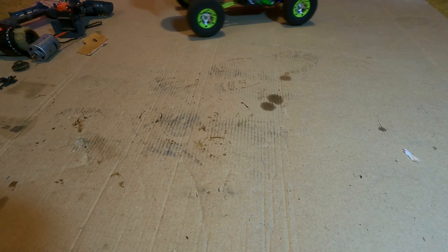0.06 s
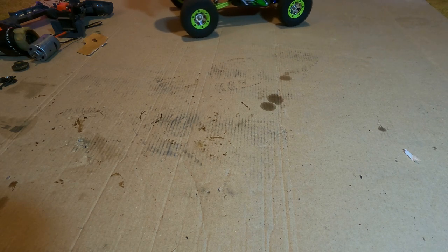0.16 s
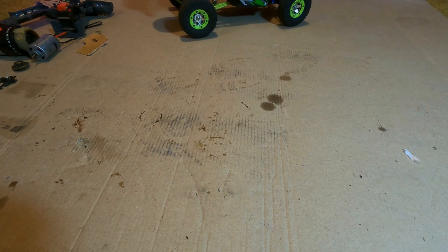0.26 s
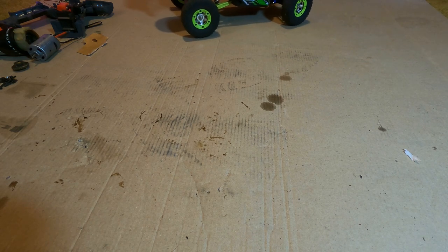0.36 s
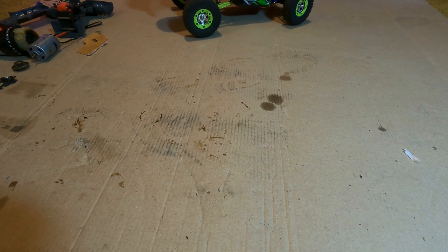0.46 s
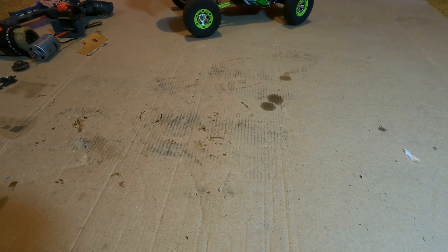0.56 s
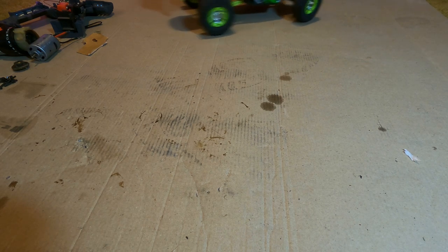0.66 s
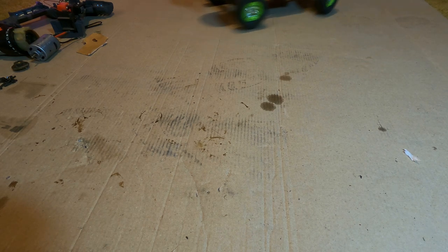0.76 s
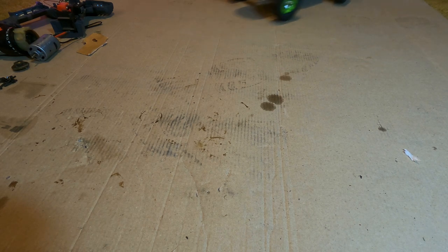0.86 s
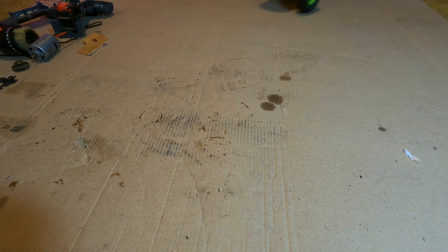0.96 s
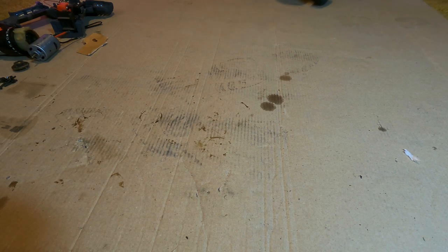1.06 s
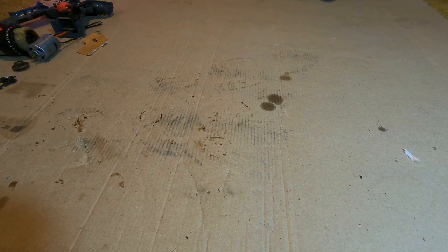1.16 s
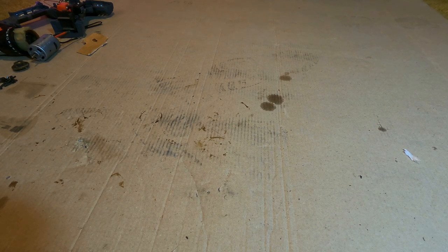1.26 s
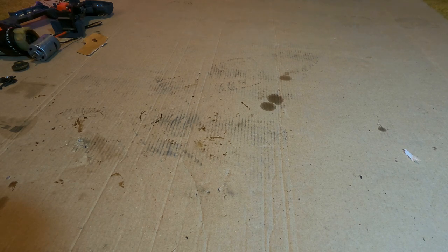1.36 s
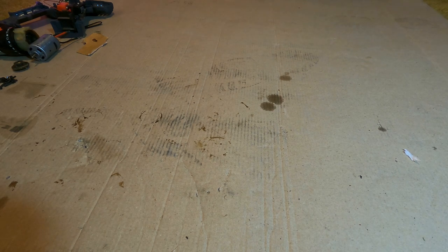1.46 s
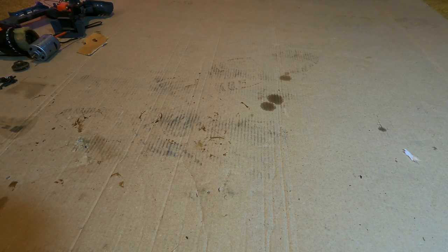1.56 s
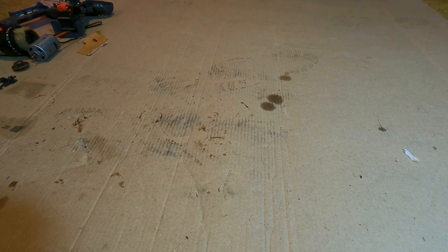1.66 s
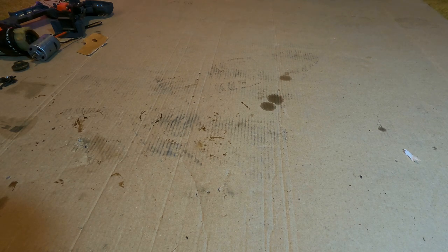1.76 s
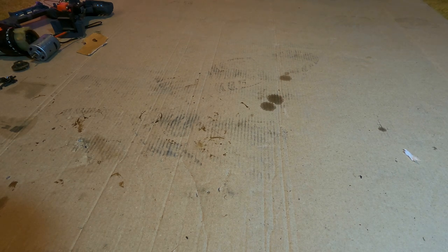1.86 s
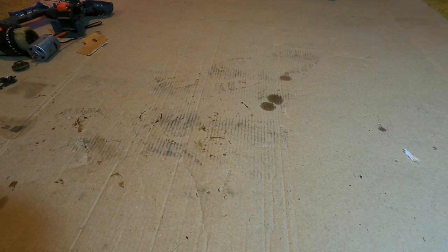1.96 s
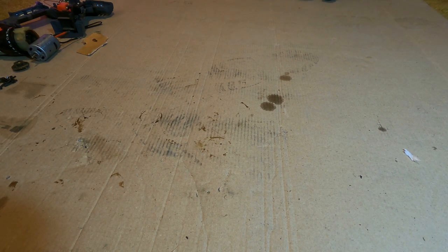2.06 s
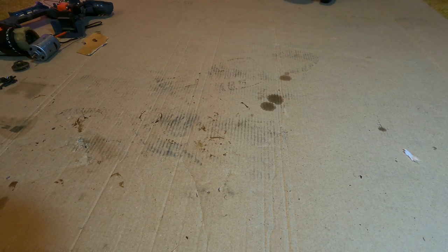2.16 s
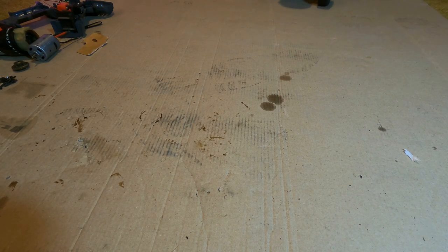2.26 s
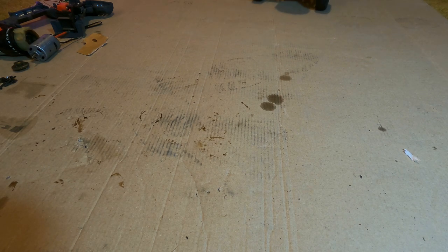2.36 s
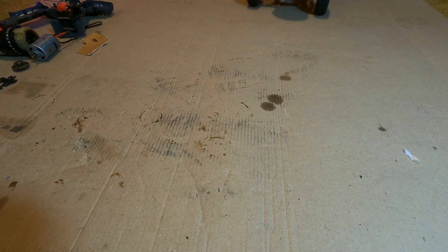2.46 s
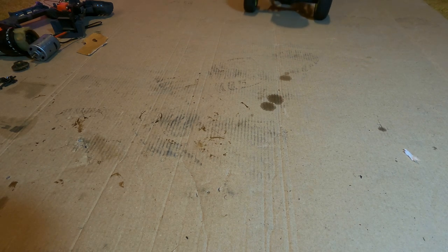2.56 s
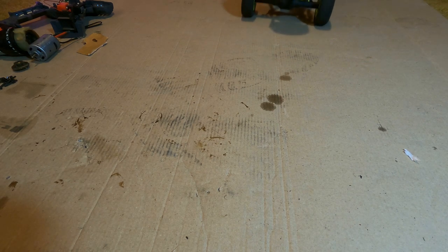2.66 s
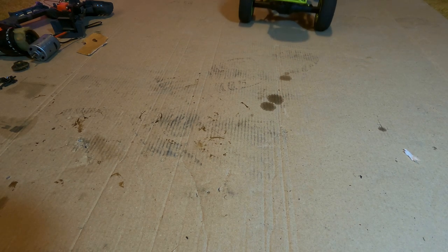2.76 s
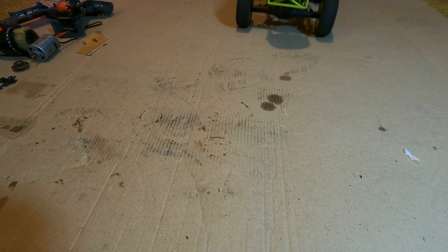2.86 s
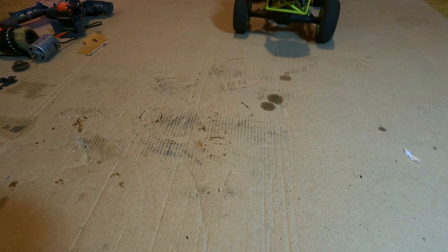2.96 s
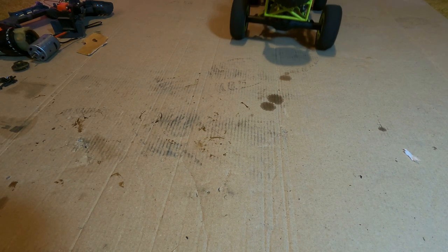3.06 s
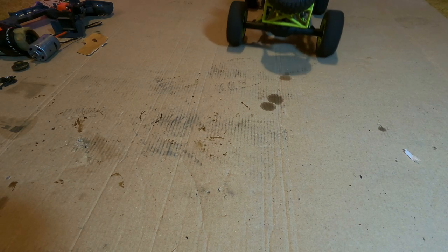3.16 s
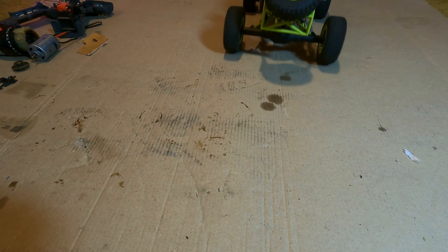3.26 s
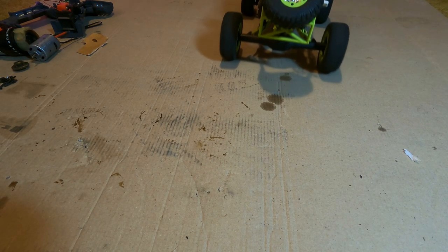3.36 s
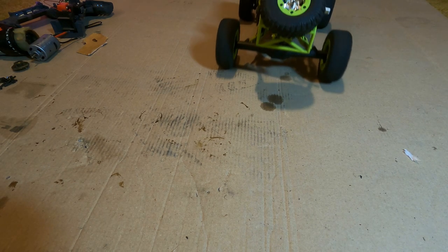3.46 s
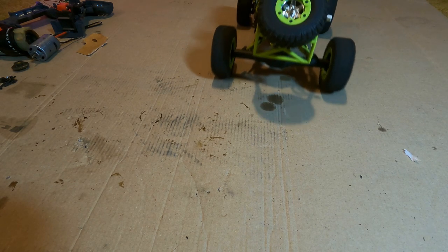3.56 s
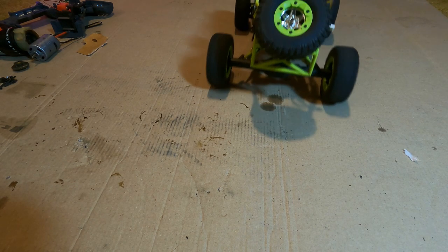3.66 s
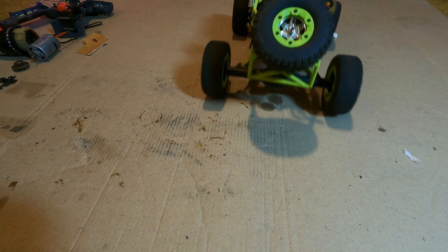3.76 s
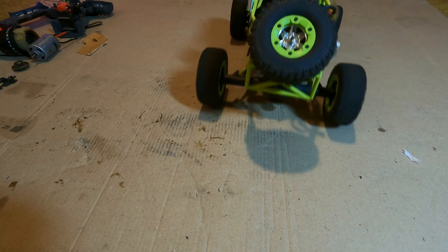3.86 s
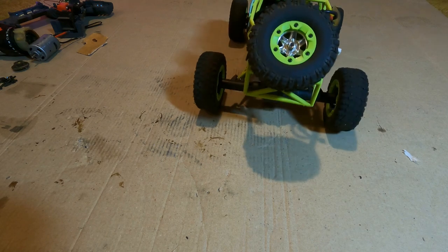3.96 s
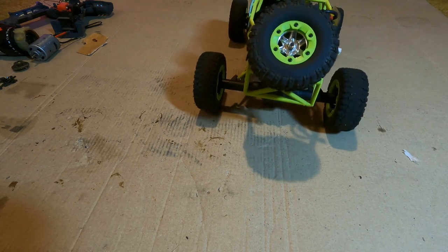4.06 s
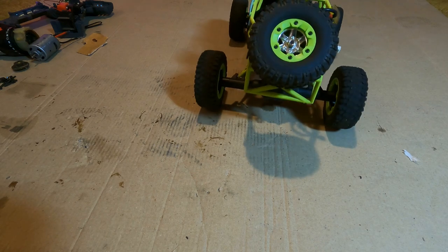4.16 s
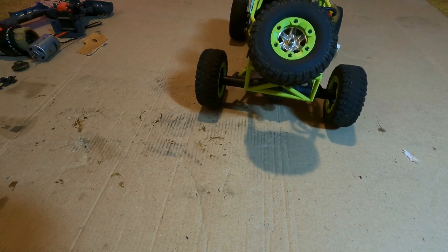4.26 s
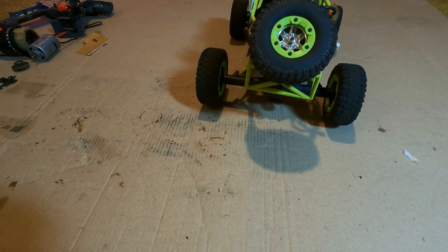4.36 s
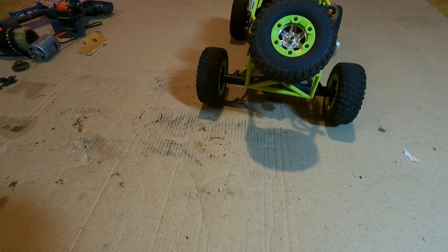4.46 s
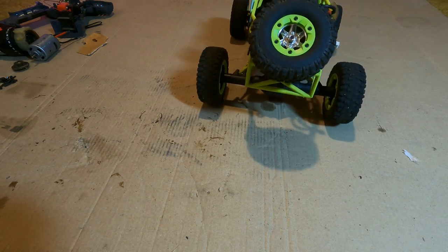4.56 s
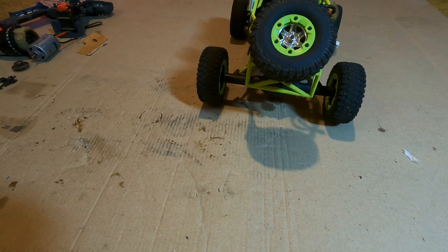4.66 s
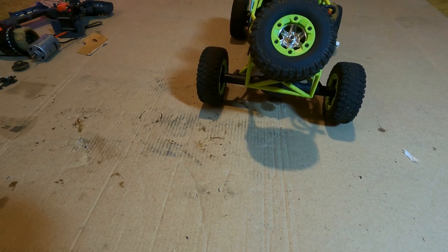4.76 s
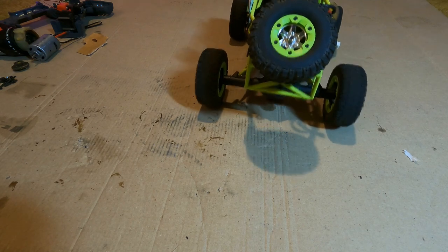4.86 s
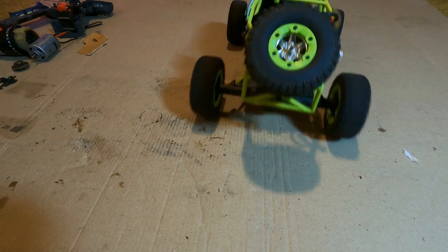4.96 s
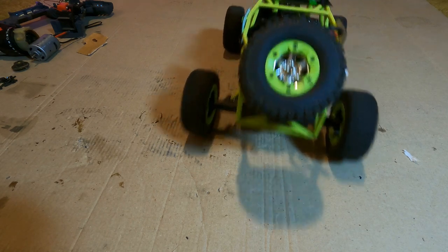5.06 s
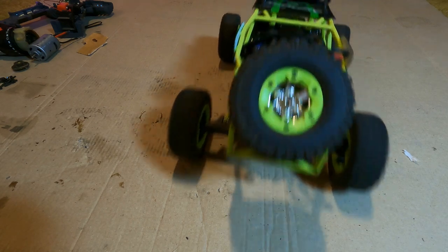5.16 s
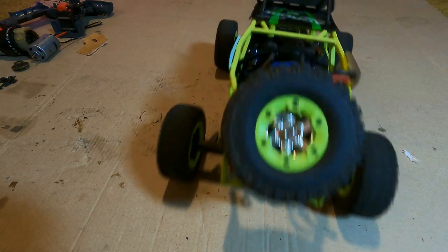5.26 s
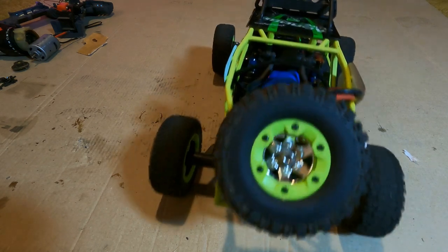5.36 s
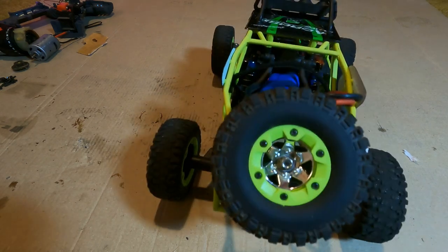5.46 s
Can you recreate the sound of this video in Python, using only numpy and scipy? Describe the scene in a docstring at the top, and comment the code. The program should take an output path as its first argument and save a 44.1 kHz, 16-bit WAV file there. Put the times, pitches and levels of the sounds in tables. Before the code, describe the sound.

A toy off-road car's steering servo whirrs, then it rattles away, creeps back with a thin electric whine, stops, and lurches closer with plastic knocks.

```python
"""First a steering servo whirrs over the room's hum, then a toy off-road car on a workshop floor drives off,
creeps back towards the microphone, stops and lurches on. Switching current sings in the motor, with rotor
side tones and a Doppler shift. Contact noise from gears and treads excites the chassis resonances,
slack parts knock as struck resonators, and a lagged noise band rumbles in the floor."""
import sys
import numpy as np
from scipy import signal
from scipy.fft import rfft, irfft
from scipy.io import wavfile

SR = 44100
rng = np.random.default_rng(int(sys.argv[2]) if len(sys.argv) > 2 else 0)


def file_out(sig):
    """Save sig as 16-bit WAV at sys.argv[1]."""
    # one column per channel
    cols = np.atleast_2d(sig).T
    # limit, then scale
    lim = np.clip(cols, -1, 1)
    pcm = np.round(lim * 32767).astype(np.int16)
    wavfile.write(sys.argv[1], SR, pcm)


N = 242991


def amp(db):
    """Logarithmic level: decibels to amplitude gain."""
    return 10 ** (np.asarray(db) / 20)


def rms_one(x):
    """Energy normalisation: scale to unit rms."""
    return x / np.sqrt(np.mean(x ** 2) + 1e-20)


def in_time(rows):
    """Linear interpolation: table columns become curves with one value a sample."""
    s, *columns = np.transpose(rows)
    return [np.interp(np.arange(N) / SR, s, column) for column in columns]


def gate(on_s, off_s, fade_s):
    """Squared-ramp envelope: fades in from on_s and is out by off_s."""
    t = np.arange(N) / SR
    return np.clip(np.minimum(t - on_s, off_s - t) / fade_s, 0, 1) ** 2


def drift(rate):
    """Low-passed noise: slow random wander with unit rms."""
    r = np.exp(-2 * np.pi * rate / SR)
    wander = signal.lfilter([1], [1, -2 * r, r * r], rng.standard_normal(N + SR))
    return rms_one(wander[SR:])


def butter_filter(x, order, edges_hz, kind):
    """Butterworth filtering: a maximally flat passband."""
    return signal.sosfilt(signal.butter(order, edges_hz, kind, fs=SR, output="sos"), x)


def band(x, edges_hz, kind):
    """Band limiting: a steep filter, then unit rms."""
    return rms_one(butter_filter(x, 4, edges_hz, kind))


def colour(x, points):
    """Minimum-phase filtering: a causal response with the given spectrum; unit rms."""
    hz, db = np.transpose(points)
    size = 8192
    bins_hz = np.arange(size // 2 + 1) * SR / size
    log_gain = np.log(amp(np.interp(np.log(bins_hz + 1), np.log(hz), db)))
    # folding the cepstrum onto positive times makes the filter causal
    cepstrum = irfft(log_gain)
    cepstrum[1:size // 2] *= 2
    cepstrum[size // 2 + 1:] = 0
    return rms_one(signal.fftconvolve(x, irfft(np.exp(rfft(cepstrum))))[:N])


def ring(clicks, hz, t60):
    """Damped resonance: a unit click starts a decaying sine of initial height 1."""
    r, w = amp(-60 / (t60 * SR)), 2 * np.pi * hz / SR
    return signal.lfilter([0, np.sin(w)], [1, -2 * r * np.cos(w), r * r], clicks + 1e-18)


def decaying(impulses, length_s):
    """Exponential relaxation: each impulse leaves an envelope that falls to 1/e in length_s."""
    return signal.lfilter([1], [1, -np.exp(-1 / (length_s * SR))], impulses)


def scratches(per_s, length_s):
    """Poisson contact process: envelope of brief random contacts; unit rms."""
    sizes = amp(3.0 * np.minimum(rng.exponential(1, N), 3)) * (rng.random(N) < per_s / SR)
    return rms_one(decaying(sizes, length_s))


def pair(spectrum, side_db, wide_db, wide_above_hz):
    """Partial coherence: coloured noise nearly alike left and right in the bass, wider above."""
    mid = colour(rng.standard_normal(N), spectrum)
    side = colour(rng.standard_normal(N), spectrum)
    side = amp(side_db) * side + amp(wide_db) * butter_filter(side, 2, wide_above_hz, "high")
    return mid + side * [[1], [-1]]


# spectrum of the room's hum: (frequency [Hz], level [dB per Hz])
HUM_SPECTRUM = [(12, -35), (20, -18), (69, -35), (101, -8.5), (123, -16.5), (150, -6), (187, -3),
                (293, -13), (349, -21.5), (405, -21.5), (532, -29), (812, -25), (1470, -27), (3790, -46),
                (7600, -43.5), (9880, -59.5), (13000, -61), (16700, -100)]
HUM_DB = -58


def hum():
    """Stationary broadband noise: the room's steady, mostly low hum."""
    return amp(HUM_DB) * pair(HUM_SPECTRUM, side_db=-10, wide_db=-7, wide_above_hz=275)


ROOM_T60_S, ROOM_DB = 0.25, -11


def room(x):
    """Diffuse reverberation: an exponentially decaying noise tail, different on each side."""
    t = np.arange(SR // 2) / SR
    tails = rng.standard_normal((2, len(t))) * amp(-60 * t / ROOM_T60_S) * (t > .003)
    tails = signal.lfilter([1], [1, -.6], tails)   # duller tail
    wet = [signal.fftconvolve(x, tail / np.sqrt(np.sum(tail ** 2)))[:N] for tail in tails]
    return amp(ROOM_DB) * np.array(wet)


# spectrum of the shaken floor: (frequency [Hz], level [dB per Hz])
FLOOR_SPECTRUM = [(11, -54), (18, -7), (51, 3.5), (98, -5.5), (130, -15), (174, -12.5), (283, -25.5),
                  (400, -25), (500, -38.5), (650, -49.5), (1100, -120)]
# wheels jolt the floor: (time [s], level [dB])
FLOOR_JOLTS = [(.22, -52.5), (.73, -47), (1.11, -51), (2.09, -49), (2.411, -43), (2.68, -56), (3.62, -46),
               (5.22, -49.5)]
JOLT_S, RUMBLE_LAG_S = 0.031, 0.014
STILL_FLOOR_DB, STEERING_SHAKE_DB = -76, -10   # floor at rest; rumble re the steering whirr


def floor_rumble(rolling_db, whirr_gain):
    """Structure-borne sound: the floor follows wheels and steering with a lag and booms at each jolt."""
    t, keep = np.arange(N) / SR, np.exp(-1 / (RUMBLE_LAG_S * SR))
    drive = amp(rolling_db) + amp(STEERING_SHAKE_DB) * whirr_gain
    shake = signal.lfilter([1 - keep], [1, -keep], drive)
    jolts = sum(amp(db) * np.exp(-((t - s) / JOLT_S) ** 2) for s, db in FLOOR_JOLTS)
    noise = pair(FLOOR_SPECTRUM, side_db=-16.0, wide_db=-16, wide_above_hz=230)
    return (shake + jolts + amp(STILL_FLOOR_DB)) * noise


# knocks: (time [s], peak of the middle band [dB], ring [Hz], low body [dB re that peak]); most are slack parts,
# but the rows from 5.02 s to 5.39 s are the pinion clacking once a turn as the car lurches on
KNOCK_ROWS = [(.2663, -33, 3340, -1), (.4415, -54, 2850, 1), (.529, -60, 4000, -10),
              (0.586, -56, 4000, -10), (.653, -30, 4330, -3), (.7415, -45, 4040, 5),
              (.9001, -24.5, 4360, -18), (.9492, -30, 5100, -24), (.9614, -25, 5730, -8),
              (1.1542, -38, 6000, -8), (1.2494, -37, 6160, -12), (1.3229, -40, 2740, 1),
              (1.451, -41, 2926, -26), (1.9025, -45, 2720, 2), (2.51, -34, 2820, -3.5),
              (3.4945, -41, 2720, -5), (3.834, -36.5, 3520, -15.5), (3.8711, -28, 4170, -9),
              (3.8877, -30, 4220, -4.5), (3.899, -24, 4570, -7), (3.9244, -36, 2670, -15),
              (3.9336, -28, 3460, -7.5), (4.278, -56, 3000, -10), (4.4283, -39, 3320, 0.5),
              (4.8181, -45.5, 3060, -4), (4.8985, -27, 3284, -6), (4.9189, -36, 3164, 4.5),
              (4.944, -39, 3360, 6), (5.0244, -39.5, 2380, 5), (5.0574, -34, 2975, -2),
              (5.0865, -38, 2700, -13), (5.1083, -39.5, 2580, 0), (5.1338, -31, 2670, 0.5),
              (5.1774, -31, 4600, -14), (5.2057, -25.5, 4229, -6), (5.2355, -28.5, 2731, -19),
              (5.2704, -30.5, 2640, -22), (5.2775, -21.5, 3800, -11), (5.2824, -23.5, 2800, -7.5),
              (5.31, -26.5, 3740, -11), (5.3457, -28, 3070, -1), (5.3842, -42, 2342, 6),
              (5.4103, -38, 2380, -13), (5.4306, -43, 2300, -12), (5.4742, -19.5, 3000, -38),
              (5.4897, -46, 2980, -8), (5.4998, -17, 5500, -5)]
# modes of the plastic body: (frequency [Hz], level [dB], decay by 60 dB [s])
BODY_MODES = [(1000, 1.5, 0.026), (1290, 12.5, 0.012), (1730, 12, 0.0083)]
CRACK_S, KNOCK_RING_S = .0014, .007   # fall to 1/e; fall by 60 dB
SNAP_DB = -31.5   # treble snap re the middle band's peak


def knocks():
    """Impact excitation: a noise crack rings near its own pitch, snaps in the treble and thumps the body."""
    size = 4096
    out, t = np.zeros(N + size), np.arange(size) / SR
    for s, db, hz, body_db in KNOCK_ROWS:
        crack = rng.standard_normal(size) * np.exp(-t / CRACK_S)
        middle = butter_filter(crack, 2, [0.7 * hz, 1.32 * hz], "band")
        middle = middle / np.abs(middle).max() + 0.064 * ring(crack, hz, KNOCK_RING_S)
        snap = butter_filter(crack, 3, [4800, 8500], "band")
        low = sum(amp(mode_db) * ring(crack, mode_hz, t60) for mode_hz, mode_db, t60 in BODY_MODES)
        at = round(s * SR)
        for part, part_db in ((middle, 0), (low, body_db), (snap, SNAP_DB)):
            out[at:at + size] += amp(db + part_db) * part / np.abs(part).max()
    return butter_filter(out[:N], 2, [700, 9000], "band")


# steering sweeps: (start [s], fastest [s], end [s], speed-up [s], slow-down [s],
# then at full speed: gear mesh [Hz], mesh tone [dB], whirr [dB])
STEERING_SWEEPS = [(-.03, .084, .22, .026, .023, 4150, -43, -43), (.2, .354, .49, .1, .057, 3170, -53, -51),
                   (1.425, 1.478, 1.65, .09, .042, 3080, -50, -52),
                   (2.54, 2.579, 2.71, .015, .04, 4000, -47, -48)]
PEAK_SHARPNESS = 1.5   # 1 a pointed top, 2 a round one
SWEEP_FADE_S = 0.032
TONE_DB_PER_OCTAVE, WHIRR_DB_PER_OCTAVE = 15, 8.5   # as the servo slows, the tone sinks faster


def sweeps():
    """Speed-dependent radiation: the servo spins up and runs down, steering mesh pitch, tone and whirr gain."""
    t, mesh_hz, tone, whirr = np.arange(N) / SR, np.zeros(N), np.zeros(N), np.zeros(N)
    for start, top, end, up, down, hz, tone_db, whirr_db in STEERING_SWEEPS:
        from_top = np.abs(t - top) / np.where(t < top, up, down)
        speed = (1 + from_top ** PEAK_SHARPNESS) ** (-1 / PEAK_SHARPNESS)
        on = gate(start, end, SWEEP_FADE_S)
        mesh_hz += (on > 0) * hz * speed
        tone += on * amp(tone_db + TONE_DB_PER_OCTAVE * np.log2(speed))
        whirr += on * amp(whirr_db + WHIRR_DB_PER_OCTAVE * np.log2(speed))
    return mesh_hz, tone, whirr


# rotor, idler gear and mesh: (multiple of the mesh frequency)
SERVO_ORDERS = [.1, 2 / 3, 1]
# their tones in the same order: (level [dB])
SERVO_ORDER_DB = [-12, -8.5, -1.5]
# the servo case lifts tones that cross its rings: (frequency [Hz], width [Hz], lift [dB])
SERVO_CASE_RINGS = [(1900, 300, 4), (3000, 300, 7)]
# spectrum of the whirr through the case: (frequency [Hz], level [dB per Hz])
SERVO_SPECTRUM = [(410, -45.5), (700, -18), (1360, -8.5), (1730, -9.5), (2560, -6), (3070, -3), (3450, -9),
                  (4470, -12.5), (4770, -10), (6500, -17), (7500, -9), (8300, -17), (8990, -17),
                  (12100, -24), (15500, -43)]
OCTAVE_DB_PER_KHZ = 10   # the octave of the mesh comes up as the servo spins faster


def servo(mesh_hz, tone_gain, whirr_gain):
    """Gear-mesh orders: tones follow the servo's speed and swell at case resonances, in a gritty whirr."""
    phase = 2 * np.pi * np.cumsum(mesh_hz * (1 + .014 * drift(200))) / SR
    tone = amp(OCTAVE_DB_PER_KHZ * (mesh_hz - 4000) / 1000) * np.sin(2 * phase)
    for order, db in zip(SERVO_ORDERS, SERVO_ORDER_DB):
        lift = sum(lift_db * np.exp(-((order * mesh_hz - hz) / width_hz) ** 2)
                   for hz, width_hz, lift_db in SERVO_CASE_RINGS)
        tone += amp(db + 3.5 * drift(90) + lift) * np.sin(order * phase)
    whirr = colour(rng.standard_normal(N) * amp(0.72 * drift(86)), SERVO_SPECTRUM)
    return tone_gain * tone + whirr_gain * whirr


# one list a drive: (time [s], dull rattle [dB], bright rattle [dB])
ROLLING_LEVELS = [
    [(.642, -52, -52), (.7, -46.5, -48.5), (.85, -44, -47), (1.018, -44, -42), (1.168, -49, -49),
     (1.282, -49.5, -54), (1.42, -69.5, -73)],
    [(1.9, -54, -58.5), (1.96, -64.5, -70), (2.15, -56.5, -61), (2.38, -55, -55.5), (2.58, -53.5, -53),
     (3.0, -57.5, -58), (3.55, -54, -58.5), (3.85, -58.5, -59), (4.06, -67.5, -65), (4.16, -81, -82)],
    [(4.893, -57.5, -55), (4.947, -55.5, -53), (5.039, -51.5, -58.5), (5.085, -51, -51.5),
     (5.187, -50.5, -51), (5.319, -54.5, -61.5), (5.39, -58, -67), (5.51, -56, -64)],
]
# one row a drive: (hiss [dB re bright], clack once a turn [dB re bright], teeth [dB re dull],
# floor rumble [dB re dull], scratches [dB re steady rubbing])
DRIVE_TRAITS = [(-18.5, -8, -19, 3, -4), (-21, 8, -19, 3, -3), (-18, -9, -17, 7.5, 6)]
START_HISS_DB, START_HISS_S = 9, 0.086   # the brushes spit as a drive starts


def rolling():
    """Level envelopes: dull and bright rattle in dB, then each drive's own traits."""
    # sudden starts, short run-outs
    spans = [[(span[0][0] - .006, -120, -120), *span, (span[-1][0] + .03, -120, -120)]
             for span in ROLLING_LEVELS]
    starts = np.array([span[0][0] for span in spans])
    t = np.arange(N) / SR
    drive = np.searchsorted(starts[1:], t)
    traits = np.array(DRIVE_TRAITS, float).T[:, drive]
    since_start = t - starts[drive]
    traits[0] += START_HISS_DB * np.exp(-np.abs(since_start) / START_HISS_S)
    return *in_time([row for span in spans for row in span]), *traits


# growl of the gear mesh in the first drive: (time [s], growl [Hz], level [dB])
GEAR_GROWL = [(.66, 1400, -72.5), (.7, 1609, -43.5), (.76, 1200, -72), (.785, 1280, -38.5),
              (.86, 1706, -44.5), (.92, 1623, -70), (1, 1763, -38.5), (1.08, 1200, -82)]
# worn teeth tick in runs: (middle [s], half length [s], level [dB])
TOOTH_RUNS = [(1.07, 0.043, -59), (1.214, 0.036, -61), (2.497, 0.045, -61), (2.96, 0.066, -62),
              (3.26, 0.1, -58.5), (3.617, .12, -59), (5.15, 0.046, -60.5)]
TEETH_PER_TURN, TOOTH_RING_HZ, TOOTH_T60_S = 5.5, 5150, .005
GROWL_LOWER, GROWL_LOWER_DB, GROWL_ROUGH_DB = 2 / 3, -9, 4   # second strand's pitch and level; fast flutter


def gears(turns, teeth_db):
    """Tooth-passing excitation: worn teeth tick at the tooth rate; during the first drive the mesh growls."""
    tooth_hz = TEETH_PER_TURN * np.clip(np.abs(turns), 15, 200) * (1 + .12 * drift(150))
    tooth = np.diff(np.floor(np.cumsum(tooth_hz) / SR), prepend=0)
    uneven = amp(2.5 * drift(20) + rng.normal(0, 2.5, N))
    ticks = rms_one(ring(tooth * uneven, TOOTH_RING_HZ, TOOTH_T60_S))
    t = np.arange(N) / SR
    runs = sum(amp(db) * np.exp(-((t - s) / half_s) ** 4) for s, half_s, db in TOOTH_RUNS)
    growl_hz, growl_db = in_time(GEAR_GROWL)
    growl = np.zeros(N)
    for ratio, db in ((1, 0), (GROWL_LOWER, GROWL_LOWER_DB)):
        phase = 2 * np.pi * np.cumsum(ratio * growl_hz * (1 + .07 * drift(88))) / SR
        growl += np.sin(phase) * amp(growl_db + db + 3.2 * drift(50) + GROWL_ROUGH_DB * drift(230))
    return (amp(teeth_db) + runs) * ticks + gate(GEAR_GROWL[0][0], GEAR_GROWL[-1][0], .01) * growl


# spectrum of the rattling chassis: (frequency [Hz], level [dB per Hz])
CHASSIS_SPECTRUM = [(260, -60), (450, -25), (550, -16), (731, 2.5), (873, 1), (1220, 3.5), (1300, 0.5),
                    (1630, 3.5), (2500, -10), (2810, -6.5), (3440, -14.5), (4260, -13.5), (5080, -13),
                    (6910, -21.5), (7600, -17.5), (9880, -41.5), (16700, -120)]
# spectrum of the brush hiss through the chassis: (frequency [Hz], level [dB per Hz])
HISS_SPECTRUM = [(4470, -30.5), (7600, 1), (8290, -7.5), (12700, -4), (14200, -21), (14800, -43),
                 (15500, -66)]
CLACK_S, CLACK_SPREAD_DB, FIRST_TURN = 0.0017, 2.5, .3   # fall to 1/e; spread; share of a turn already made
THRUM_DB, THRUM_DB_PER_DOUBLING = -19.5, 5.5   # re dull at 35 turns per s; rise per doubling of speed
LUMPY_DB = 1.5   # random unevenness of the rattle


def drivetrain(turns, dull_db, bright_db, hiss_db, clack_db, grit_db):
    """Contact excitation: scratches over rubbing and a clack a turn shake the chassis; brushes hiss, tyres thrum."""
    grit = amp(grit_db)
    turned = np.diff(np.floor(FIRST_TURN + np.cumsum(np.abs(turns)) / SR), prepend=0)
    turned = turned * amp(rng.normal(0, CLACK_SPREAD_DB, N))
    clack = amp(clack_db) * decaying(turned + 1e-18, CLACK_S)   # the pinion
    shared, treads, cogs = scratches(65, 0.0013), scratches(120, 0.0032), scratches(150, 0.00083)
    steady = np.sqrt(1 + grit ** 2)
    dull_force = (1 + grit * (0.5 * shared + 0.56 * treads)) / steady + 0.21 * clack
    bright_force = (1 + grit * (0.97 * shared + 0.51 * cogs)) / steady + clack
    hiss_force = 1 + 0.24 * shared + .2 * clack
    dull = band(colour(rng.standard_normal(N) * dull_force, CHASSIS_SPECTRUM), 3100, "low")
    bright = band(colour(rng.standard_normal(N) * bright_force, CHASSIS_SPECTRUM), 2600, "high")
    hiss = band(colour(rng.standard_normal(N) * hiss_force, HISS_SPECTRUM), 7800, "high")
    dull *= amp(dull_db + LUMPY_DB * drift(23))
    bright *= amp(bright_db + LUMPY_DB * drift(26))
    hiss *= amp(bright_db + hiss_db + 2.1 * drift(8.4))
    speed = np.clip(np.abs(turns), 15, 200)
    thrum_db = dull_db + THRUM_DB + THRUM_DB_PER_DOUBLING * np.log2(speed / 35)
    thrum = band(rng.standard_normal(N), [280, 560], "band") * amp(thrum_db)
    return dull + bright + thrum + hiss


# motor: (time [s], speed [turns per s, + towards the microphone], side tones [dB re the middle tone])
MOTOR_SPEED = [(.6, -3.5, -20), (.7, -51, -23), (.88, -115, -6), (.93, -120, -7), (1.3, 1, -37),
               (1.88, 1, -45), (2.1, 30.5, -19), (2.25, 43, -20), (2.5, 49, -13), (2.6, 40, 7),
               (2.8, 33, 22), (3.2, 33, 13), (3.5, 30, 0), (3.75, 37, -10), (3.9, 34, -27),
               (4.1, 0.5, -21.5), (4.88, -1, -41), (4.93, 8.5, -13), (5.06, 33.5, -1), (5.18, 45, 19),
               (5.45, 19, 2)]


def motor():
    """Kinematics: motor speed and side-tone level run straight from point to point."""
    return in_time(MOTOR_SPEED)


# throttle held: (on [s], off [s], switching whine at standstill [dB])
THROTTLE_HELD = [(.58, .92, -60), (1.255, 3.93, -64), (4.475, 5.23, -62.5)]
# side tones' distance from the middle tone: (multiple of the motor's turns per s)
SIDE_ORDERS = [-3, -2, -1, 1, 2, 3]
# side tones in the same order: (level [dB re the motor table's side level])
SIDE_ORDER_DB = [-19, -49.5, 6.5, 1, -50, -12]
SWITCHING_HZ, METRES_PER_TURN = 8000, 0.00753   # at standstill; car's travel per motor turn
WHINE_FADE_S = 0.053
WHINE_LOADED_DB, LOADED_TURNS = 5.5, 5.1   # limit of the swell; speed [turns per s] that sets its onset


def whine(turns, side_db):
    """Modulation and Doppler effect: the turning rotor splits the switching tone, the car's speed shifts it."""
    held = sum(amp(db) * gate(on, off, WHINE_FADE_S) for on, off, db in THROTTLE_HELD)
    loaded_db = WHINE_LOADED_DB * np.tanh(np.abs(turns) / LOADED_TURNS)
    doppler = 1 + turns * METRES_PER_TURN / 343   # speed of sound 343 m/s
    carrier = 2 * np.pi * np.cumsum(SWITCHING_HZ * doppler) / SR
    rotor = 2 * np.pi * np.cumsum(np.abs(turns) * (1 + 0.023 * drift(7))) / SR
    sides = sum(amp(db + 2.0 * drift(22)) * np.sin(carrier + order * rotor)
                for order, db in zip(SIDE_ORDERS, SIDE_ORDER_DB))
    tone = (np.sin(carrier) + amp(side_db) * sides) / np.sqrt(.5 + amp(side_db) ** 2)
    return held * amp(loaded_db + 1.37 * drift(25)) * tone


def scene():
    """Superposition: hum, floor rumble and room tail lie under the direct sound of the car."""
    turns, side_db = motor()
    dull_db, bright_db, hiss_db, clack_db, teeth_db, rumble_db, grit_db = rolling()
    mesh_hz, tone_gain, whirr_gain = sweeps()
    background = hum() + floor_rumble(dull_db + rumble_db, whirr_gain)
    car = knocks() + servo(mesh_hz, tone_gain, whirr_gain)
    car += gears(turns, dull_db + teeth_db)
    car += drivetrain(turns, dull_db, bright_db, hiss_db, clack_db, grit_db)
    tone = whine(turns, side_db)
    direct = car + tone
    # the right port is a little nearer: one sample earlier and louder
    near = np.array([np.roll(direct, 1), direct]) * amp([[-.6], [.6]])
    return background + room(car + 0.36 * tone) + near


ALIKE_ABOVE_HZ, CUTOFF_HZ = 5800, 15700
TREBLE_SIDE = 0.079   # share of the left-right difference kept in the treble


def record(dry):
    """Mid-side coherence and band limit: the treble is nearly alike in both channels; the top is cut."""
    mid, side = (dry[0] + dry[1]) / 2, (dry[0] - dry[1]) / 2
    low = signal.sosfiltfilt(signal.butter(2, ALIKE_ABOVE_HZ, fs=SR, output="sos"), side)
    side = low + TREBLE_SIDE * (side - low)
    top_cut = signal.cheby2(12, 70, CUTOFF_HZ, fs=SR, output="sos")
    return signal.sosfilt(top_cut, [mid + side, mid - side])


dry = scene()
out = record(dry)
file_out(out)
```